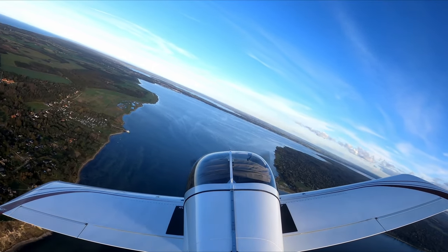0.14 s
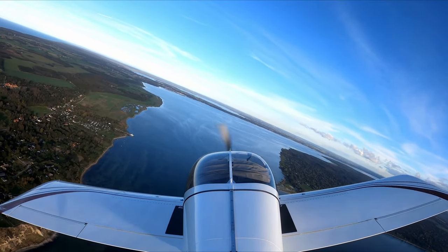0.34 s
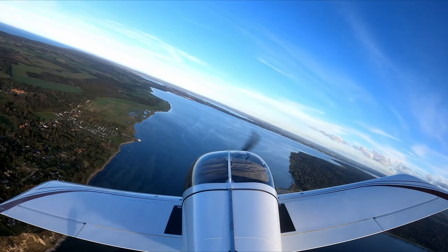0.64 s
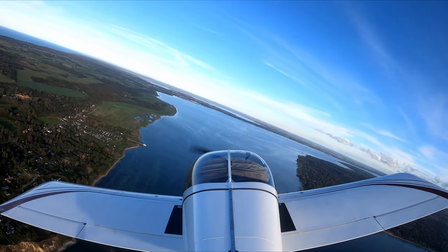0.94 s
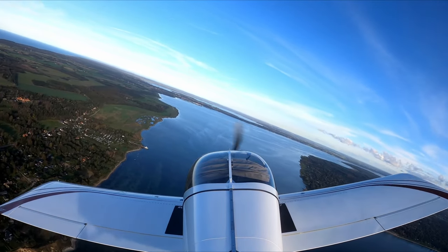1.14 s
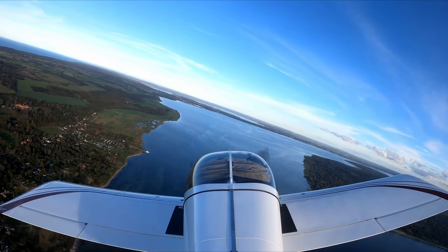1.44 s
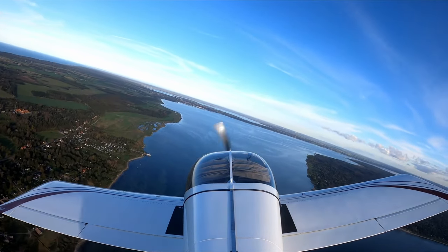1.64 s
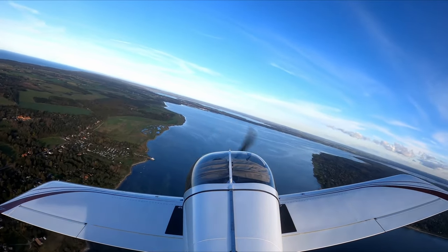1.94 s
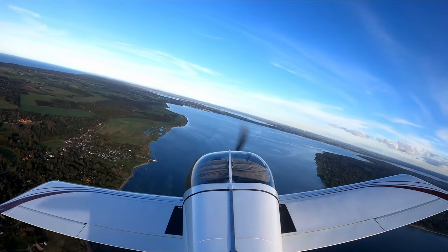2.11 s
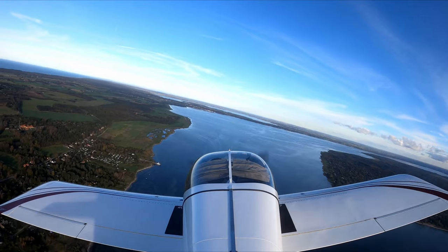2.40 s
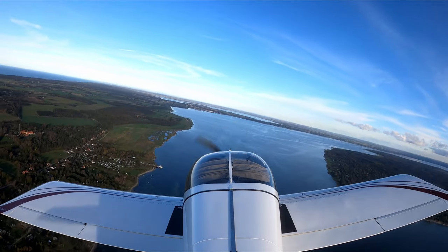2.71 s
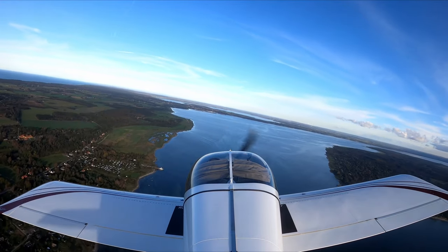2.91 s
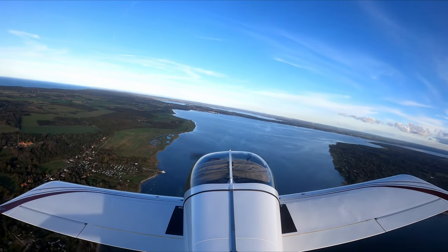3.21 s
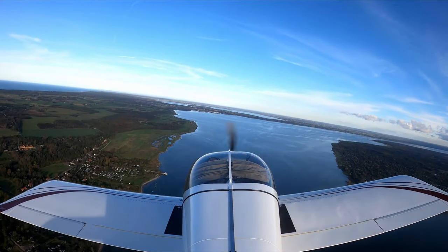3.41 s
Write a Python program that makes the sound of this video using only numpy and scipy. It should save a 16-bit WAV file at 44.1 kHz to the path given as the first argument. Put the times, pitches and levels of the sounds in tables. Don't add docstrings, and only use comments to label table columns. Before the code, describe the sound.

Light aircraft engine hums low and constant in flight, wrapped in dense airflow noise and faint hiss

```python
import sys
import numpy as np
from scipy import signal
from scipy.fft import rfft, irfft
from scipy.io import wavfile

SR = 44100
rng = np.random.default_rng(int(sys.argv[2]) if len(sys.argv) > 2 else 0)


def output_pcm(signal):
    pcm = np.clip(np.atleast_2d(signal).T, -1, 1) * 32767
    wavfile.write(sys.argv[1], SR, np.round(pcm).astype(np.int16))


def volts_from_decibels(level):
    exponent = np.asarray(level, float) / 20
    return 10 ** exponent


N = 156555
OPPOSITE = np.array([[1], [-1]])


def rms_one(x):
    return x / np.sqrt(np.mean(x ** 2) + 1e-20)


def at_hz(points, hz):
    freq_hz, level_db = np.transpose(points)
    return np.interp(np.log(hz), np.log(freq_hz), level_db)


def drift(rate_hz):
    pole = np.exp(-80 * np.pi * rate_hz / SR)
    noise = rng.standard_normal(N // 40 + 2002)
    slow = signal.lfilter([1], [1, -2 * pole, pole * pole], noise)[2000:]
    return np.interp(np.arange(N) / 40, np.arange(len(slow)), rms_one(slow))


def bump(hz, centre_hz, width_hz):
    return 1 / (1 + (2 * (hz - centre_hz) / width_hz) ** 2)


def resonant_noise(channels, centre_hz, width_hz):
    hz = np.fft.rfftfreq(N, 1 / SR)
    noise = rfft(rng.standard_normal((channels, N)))
    return rms_one(irfft(noise * bump(hz, centre_hz, width_hz), N))


ENGINE_ORDERS = [.25, .5, .75, 1, 1.25, 1.5, 2, 2.25, 2.5, 3, 3.25, 4, 5, 7, 9.5, 9.75, 10, 10.25, 10.5]
ENGINE_ORDERS_DB = [-41, -29, -25.5, -1, -21.5, -20.5, -18.5, -32.5, -35, -13.5, -27, -42, -28.5, -36, -42,
                    -35, -41.5, -39.5, -36.5]


def engine():
    firing_hz = 77.55 * (1 + .0006 * drift(3.2))
    turn = 2 * np.pi * np.cumsum(firing_hz) / SR
    tones = 0
    for multiple, level_db in zip(ENGINE_ORDERS, ENGINE_ORDERS_DB):
        random_phase = rng.uniform(0, 2 * np.pi)
        phase = 2.4 if multiple % 1 == 0 else random_phase
        flutter_db = .3 + .8 * min(-level_db / 30, 1)
        lean_db = 1.1 * (multiple == 2) * OPPOSITE
        level = volts_from_decibels(level_db + lean_db + flutter_db * drift(4.2))
        tones = tones + level * np.cos(multiple * turn + phase)
    return np.sqrt(2) * volts_from_decibels(-28.5) * tones


# freq_hz, density_db_per_hz
AIRFRAME_ROAR = [(12, -9), (60, -9), (110, -1.5), (210, -8), (460, -15.5), (900, -22), (2500, -25.5),
                 (5000, -33)]
# centre_hz, width_hz
CABIN_MODES = [(345, 70), (600, 55), (718, 45), (975, 110), (1140, 90), (1290, 140), (1475, 50),
               (1650, 200), (1840, 80), (1935, 40), (2195, 80), (2352, 40), (3470, 70), (3780, 200)]
CABIN_MODES_DB = [8, 9, 3, 5.5, -4, 3.5, -2.5, 4, 3, -3.5, -3.5, 5.5, 5, 4]


def cabin_colour(hz):
    colour_db = at_hz(AIRFRAME_ROAR, hz) - 12 * np.log2(np.maximum(hz / 5000, 1))
    for (centre_hz, width_hz), gain_db in zip(CABIN_MODES, CABIN_MODES_DB):
        colour_db = colour_db + gain_db * bump(hz, centre_hz, width_hz)
    return colour_db


# freq_hz, density_db_per_hz
LEAK_HISS = [(4500, 2.5), (6400, -7), (7200, -7), (8800, -8.5), (10300, -5.5), (11300, -13), (14200, -7),
             (15700, -15)]


def hiss_colour(hz):
    fade_db = -12 * np.log2(np.maximum(4500 / hz, 1))
    return at_hz(LEAK_HISS, hz) + fade_db + 7.5 * bump(hz, 13100, 1000)


# freq_hz, left_minus_right_db
PORT_BALANCE = [(200, 0.7), (2800, 0.1), (4400, -3.5), (6200, -0.3), (8000, 2), (10000, 3.5), (13200, 4),
                (15500, 9)]
# freq_hz, side_minus_mid_db
PORT_WIDTH = [(55, -39), (250, -26.5), (1000, -15), (1300, -26), (1750, -14), (2800, -15), (3300, -8),
              (11000, 5)]


def turbulence(gust):
    roar_db, hiss_db, gust_db, patch_db = -37.5, -55, .55, .35
    hz = np.fft.rfftfreq(N, 1 / SR) + 1
    mid, side = rfft(rng.standard_normal((2, N)))
    roar = volts_from_decibels(roar_db) * rms_one(volts_from_decibels(cabin_colour(hz)))
    hiss = volts_from_decibels(hiss_db) * rms_one(volts_from_decibels(hiss_colour(hz)))
    shadow = volts_from_decibels(-3.5 * bump(hz, 7250, 600))
    colour = np.hypot(roar, hiss) * shadow
    tilt = volts_from_decibels(at_hz(PORT_BALANCE, hz) / 2)
    pair = colour * (mid + volts_from_decibels(at_hz(PORT_WIDTH, hz)) * side * OPPOSITE) * [tilt, 1 / tilt]
    half_octave = 2 * np.log2(np.maximum(hz / 20, 1))
    out = 0
    for k in range(20):
        share = np.cos(np.pi / 2 * np.clip(half_octave - k, -1, 1)) ** 2
        swell = volts_from_decibels(gust_db * gust + patch_db * drift(16.0))
        out = out + swell * irfft(pair * share, N)
    return out


def vent(centre_hz, width_hz, level_db):
    mid, side = resonant_noise(2, centre_hz, width_hz)
    return volts_from_decibels(level_db) * (mid + volts_from_decibels(-23.5) * side * OPPOSITE)


# time_s, low_whistle_db
AIRFLOW = [
    (0, 0),
    (1.2, 2),
    (2.0, 6),
    (2.9, 4.5),
    (3.55, 3),
]


def vents():
    time_s, whistle_db = np.transpose(AIRFLOW)
    flow_db = np.interp(np.arange(N) / SR, time_s, whistle_db)
    flow_db = flow_db - flow_db.mean()
    low = vent(centre_hz=1335, width_hz=110, level_db=-59.5 + 2.2 * flow_db)
    high = vent(centre_hz=2012, width_hz=100, level_db=-58.5 - 1.2 * flow_db)
    return low + high


def buffet():
    return volts_from_decibels(-72) * resonant_noise(1, centre_hz=56, width_hz=25) * OPPOSITE


def scene():
    gust = drift(4.5)
    return engine() + turbulence(gust) + vents() + buffet()


def top_cut(x):
    return signal.sosfilt(signal.butter(12, 15740, fs=SR, output="sos"), x)


def record(dry):
    return top_cut(dry)


dry = scene()
out = record(dry)
output_pcm(out)
```